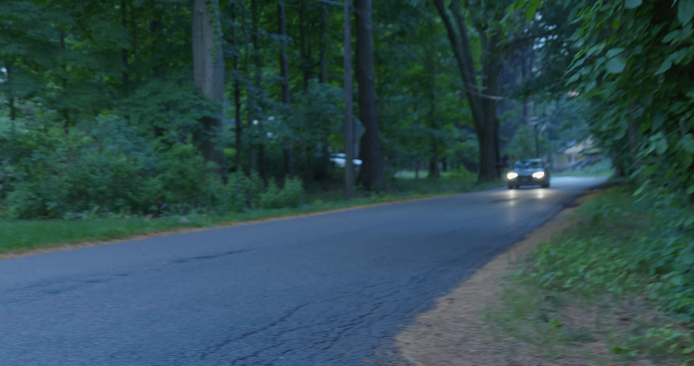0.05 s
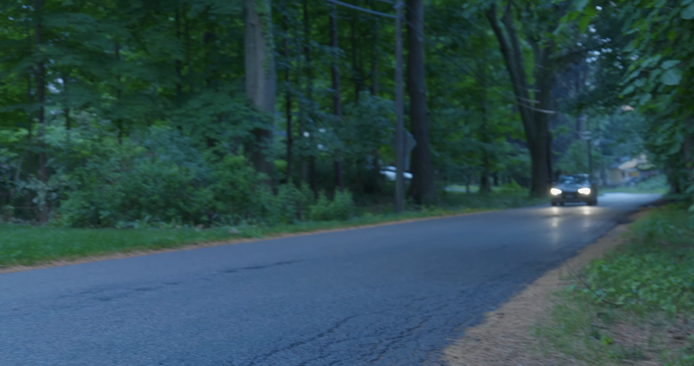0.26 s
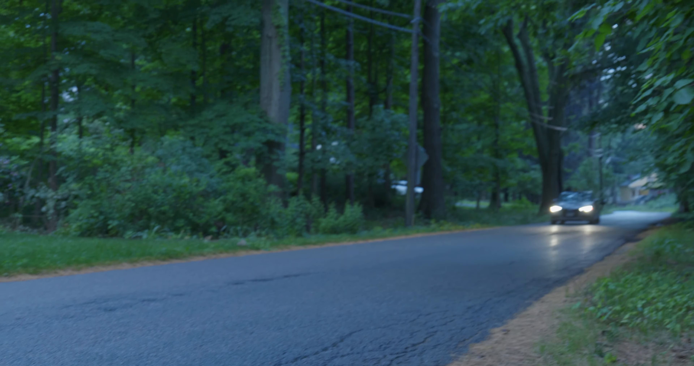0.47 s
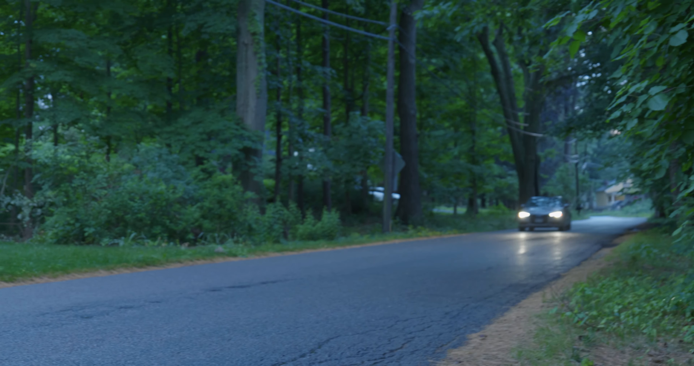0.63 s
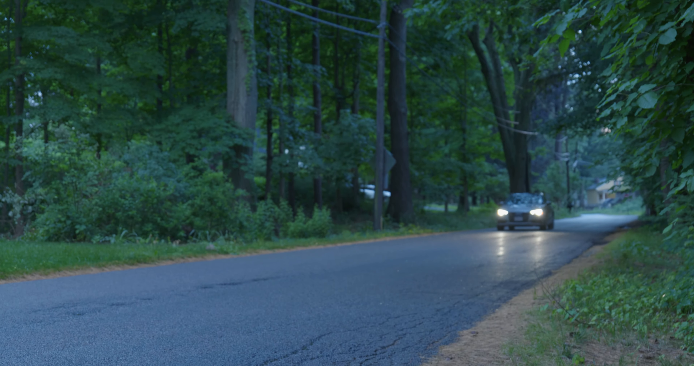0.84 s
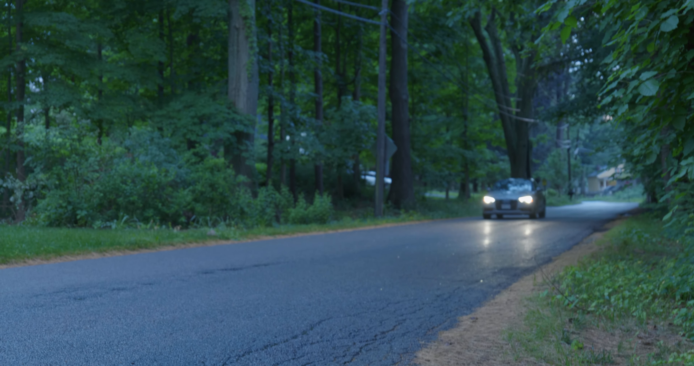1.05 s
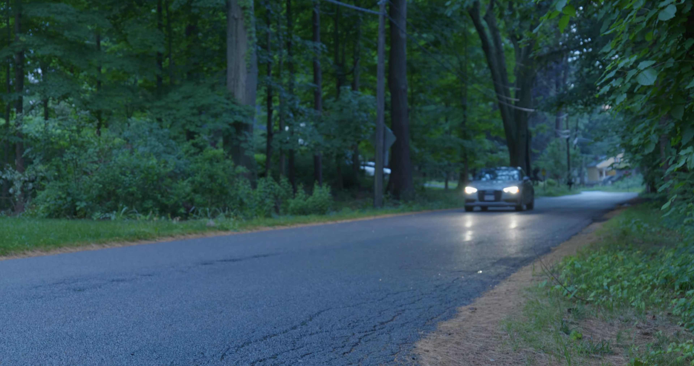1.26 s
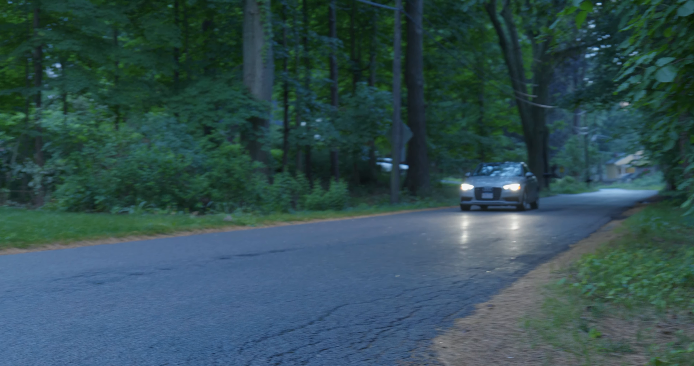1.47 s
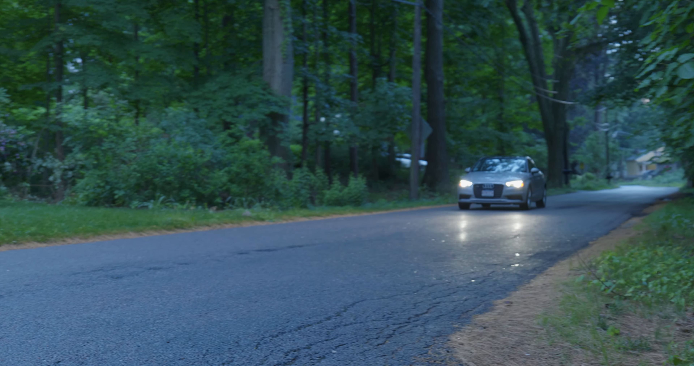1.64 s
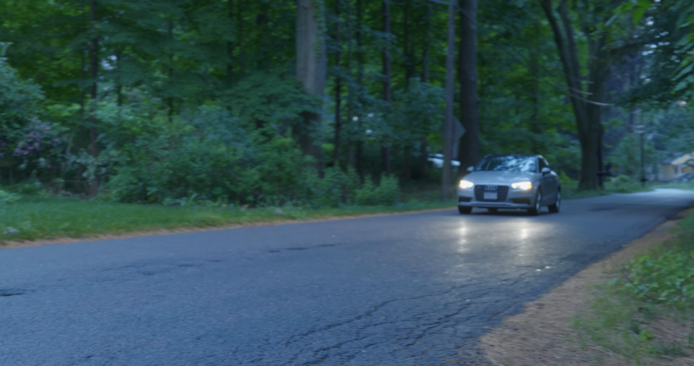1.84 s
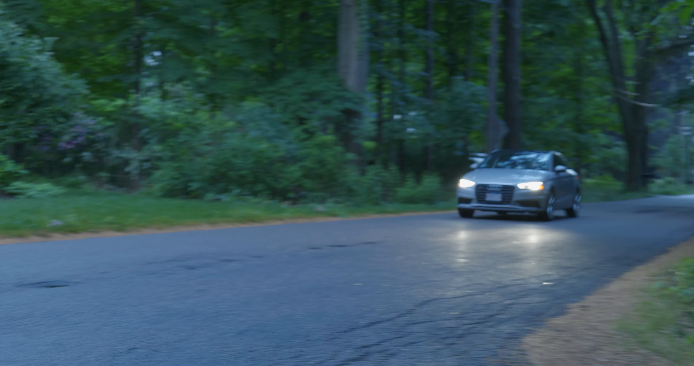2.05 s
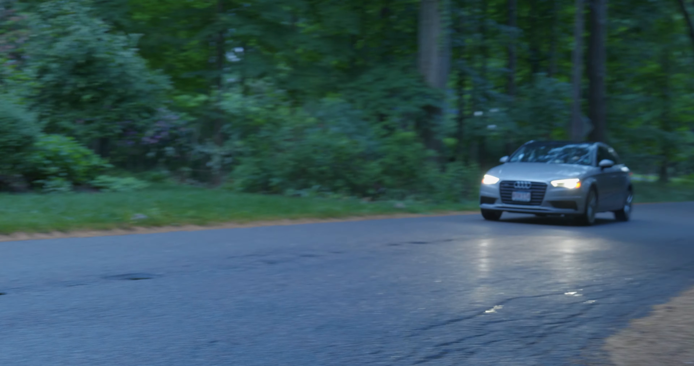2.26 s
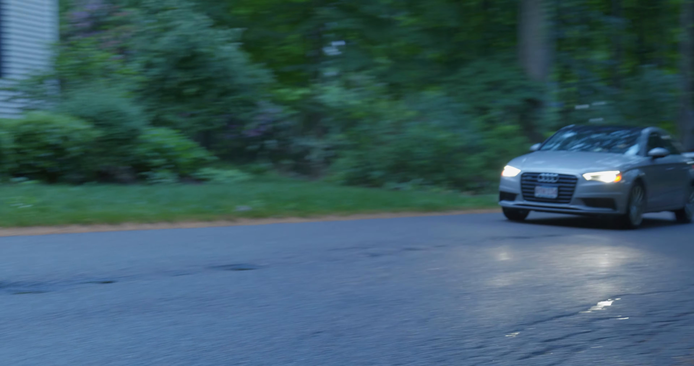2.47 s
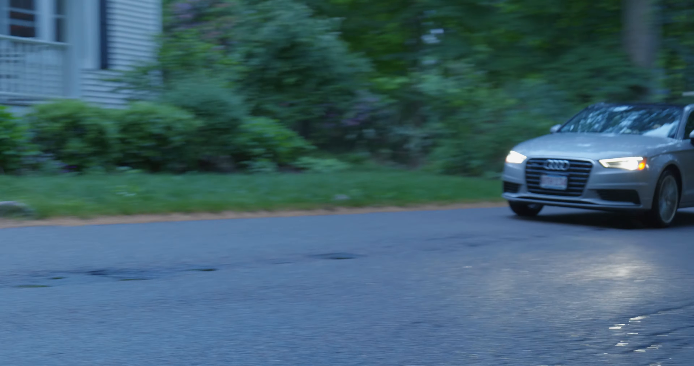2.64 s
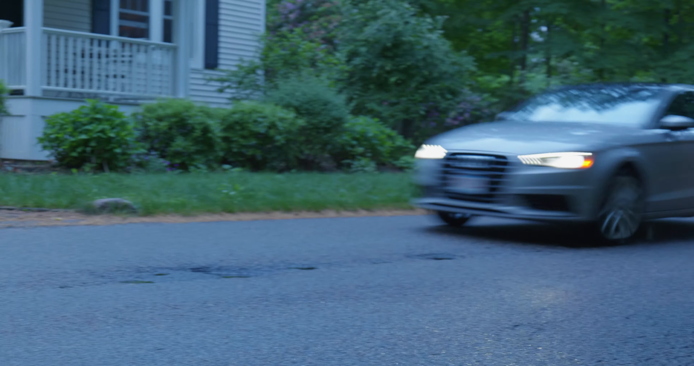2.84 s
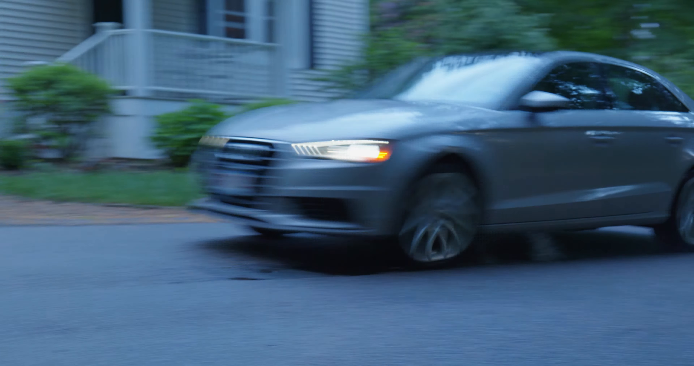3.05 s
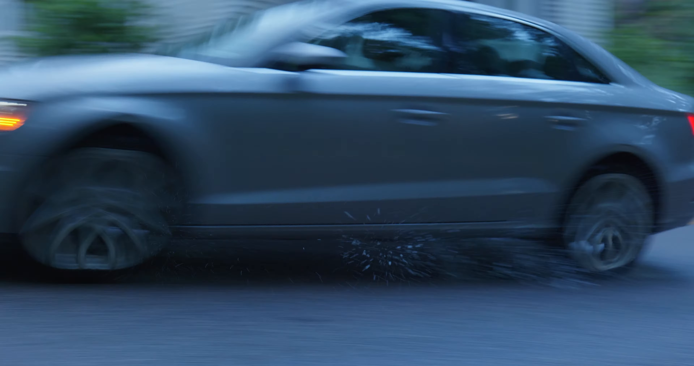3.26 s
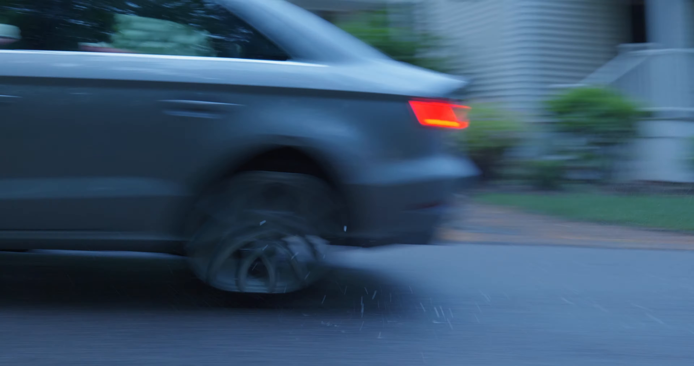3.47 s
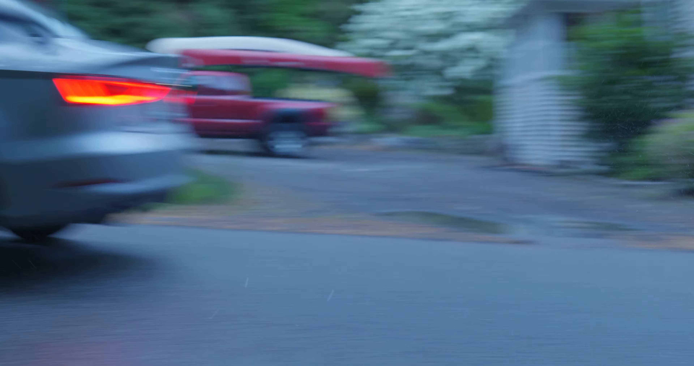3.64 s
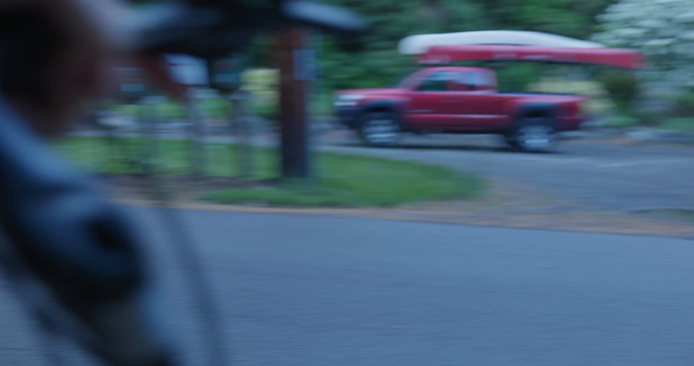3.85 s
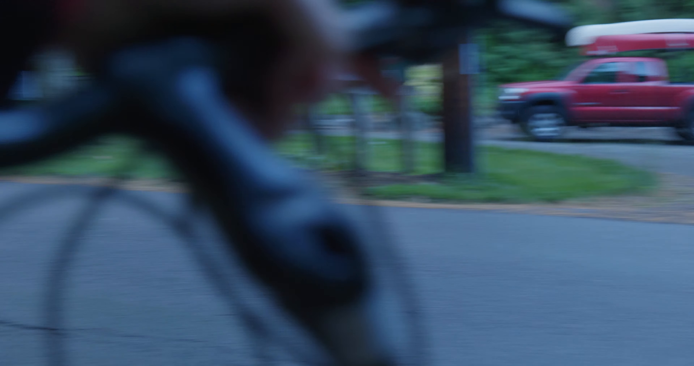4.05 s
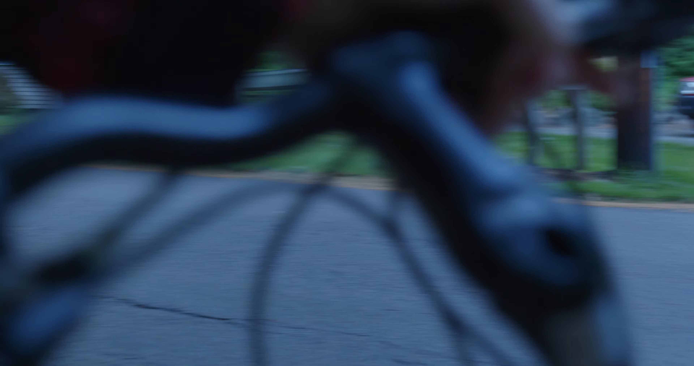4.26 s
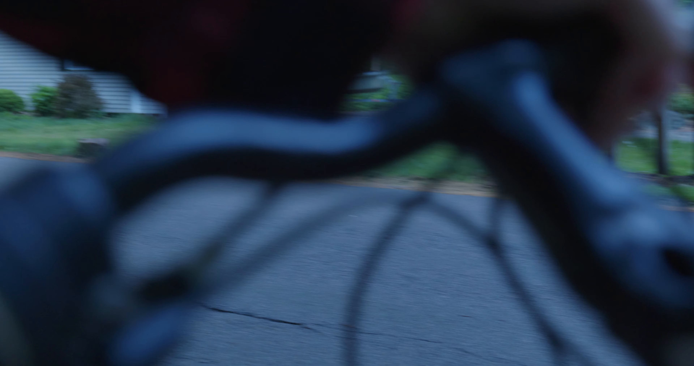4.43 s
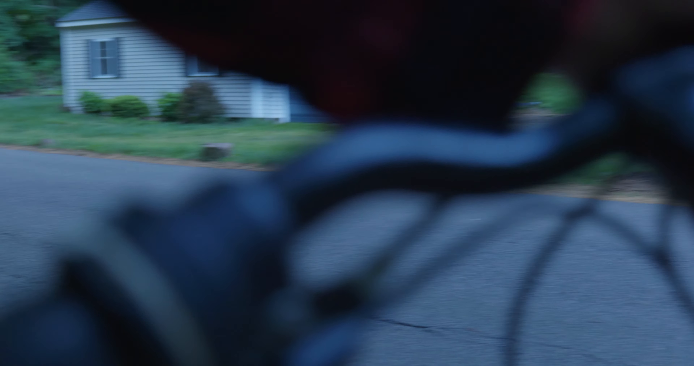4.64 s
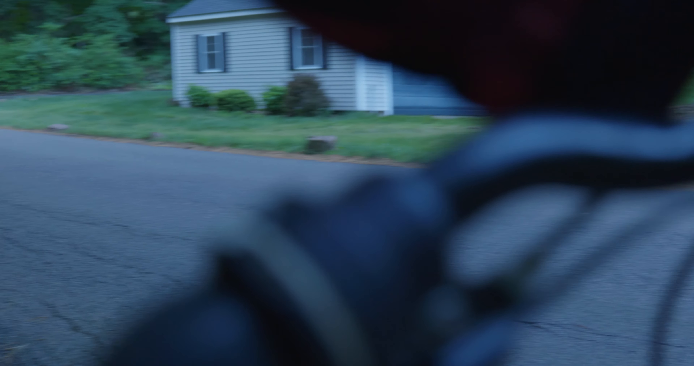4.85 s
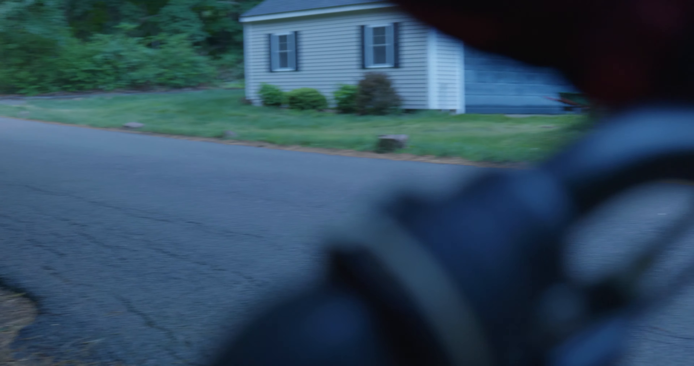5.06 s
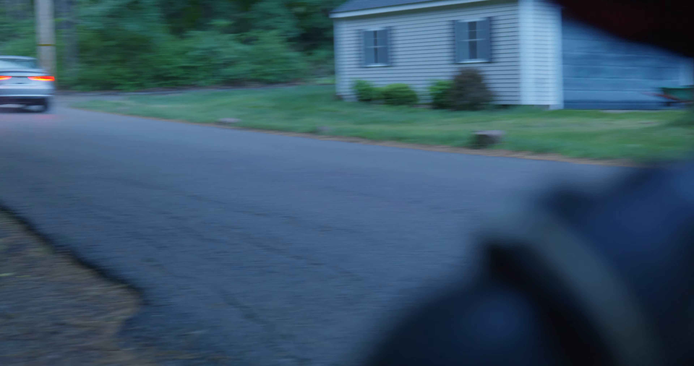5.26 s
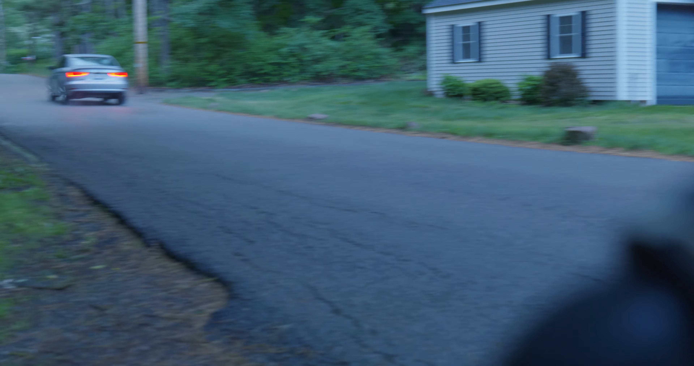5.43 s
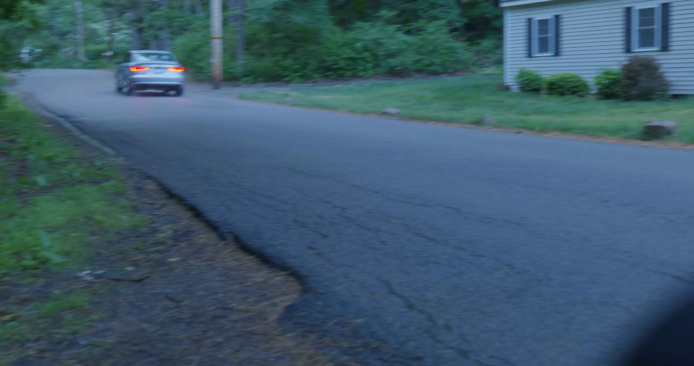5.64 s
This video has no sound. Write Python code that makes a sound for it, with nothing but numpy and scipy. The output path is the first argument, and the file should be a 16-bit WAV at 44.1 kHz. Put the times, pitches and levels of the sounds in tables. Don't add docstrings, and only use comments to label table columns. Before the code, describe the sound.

In still, dripping woods, a car's tyres approach on wet asphalt, rumble and roar swelling for three seconds. At the close pass, wheels slap puddles in rapid sharp splashes with hard little pops, then a bright spray hiss recedes. Outdoor microphone close to the roadside, nearly mono, turning after the car.

```python
import sys
import numpy as np
from scipy import signal
from scipy.fft import rfft, irfft
from scipy.io import wavfile
from scipy.ndimage import uniform_filter1d

SR = 44100
rng = np.random.default_rng(int(sys.argv[2]) if len(sys.argv) > 2 else 0)


def int16_out(signal):
    q = np.round(np.clip(np.atleast_2d(signal).T, -1, 1) * 32767)
    wavfile.write(sys.argv[1], SR, q.astype(np.int16))


def how_loud(loudness_db):
    steps = np.asarray(loudness_db, float) / 20
    return 10 ** steps


N = 251370
FRAME = 2048


def evened(x):
    return x / np.sqrt(np.mean(x ** 2) + 1e-20)


def read(points, hz):
    f, value = np.transpose(points)
    return np.interp(np.log(hz + 1), np.log(f + 1), value)


def over_time(points, t):
    return np.interp(t, *np.transpose(points))


def add(mix, s, sound):
    part = mix[:, max(round(s * SR), 0):][:, :sound.shape[1]]
    part += sound[:, :part.shape[1]]


def coloured(x, gain_db):
    hz = np.fft.rfftfreq(x.shape[-1], 1 / SR)
    return irfft(rfft(x) * how_loud(gain_db(hz)), x.shape[-1])


def panned(level_db, pan_db):
    return how_loud(level_db + np.array([[0.5], [-0.5]]) * pan_db)


# (time [s], bearing [0 coming, 1 alongside, 2 just past, 3 leaving])
BEARING = [(0, 0), (2.6, 0.24), (3.15, 1.18), (3.45, 1.1), (3.75, 3.5), (4.0, 3), (4.3, 3), (5.7, 3)]
# (frequency [Hz], level [dB per Hz])
COMING = [(60, -60), (100, -11.5), (270, -1.5), (390, -14), (500, -14), (780, -13), (1030, 2.5),
          (1700, -10), (2550, -16), (3300, -23.5), (4300, -27.5), (5300, -35), (8000, -39.5),
          (10500, -54.5), (15800, -71)]
ALONGSIDE = [(60, -29), (120, -5.5), (221, 1), (307, -2), (450, -18), (694, -2), (1100, -5), (1850, -11),
             (2800, -27), (3900, -34.5), (5000, -43), (7000, -42.5), (11000, -53), (15800, -64)]
PAST = [(60, -34), (136, -12), (232, -12.5), (416, -8), (618, -14.5), (1190, -5), (2000, -12.5),
        (3400, -21.5), (4100, -23), (5200, -33), (7200, -39), (10100, -45.5), (13500, -55), (15800, -65)]
LEAVING = [(50, -44), (110, -16), (232, -7.5), (340, -13.5), (450, -8.5), (850, 1.5), (1500, 0),
           (2000, -10), (2900, -14.5), (4000, -13.5), (5200, -17), (7500, -20.5), (10100, -21),
           (12800, -31.5), (14500, -46), (15800, -60)]
# (frequency [Hz], width [Hz], level [dB])
CAVITY = [
    (179.5, 8.8, 5.5),
    (229.9, 10.1, 9),
    (289.7, 10.6, 10),
]


def colour_db(hz, t):
    bearing = over_time(BEARING, t)
    db = 0
    for k, colour in enumerate((COMING, ALONGSIDE, PAST, LEAVING)):
        share = np.clip(1 - abs(bearing - k), 0, 1)
        db = db + np.outer(read(colour, hz), share)
    for centre, width, lift_db in CAVITY:
        db = db + lift_db * np.exp(-((hz - centre) / width) ** 2)[:, None]
    return db


PASS_S, SPEED_M_S, NEAREST_M = 3.276, 12.44, 2.95
# (level at the pass [dB], share of distance loss [1], fore-and-aft beaming [dB],
# share of coarse road [1], share of standing water [1])
LAYERS = [
    (-17, 1.554, 0.2, 1.2, 0.01),
    (-21, 1.205, 9.5, 0.17, 0.011),
    (-34, 0.89, 5.5, 0.092, 0.3),
    (-36.5, 1.212, 0.3, 0.01, 1.17),
]
# (time [s], level [dB])
COARSE = [(0, 1), (1.0, 2.5), (1.33, 5), (1.63, 6), (1.95, 1), (2.24, -2), (2.5, 0.5), (2.78, 0.5),
          (3.2, -0.5), (3.32, 1.5), (3.48, -1), (3.87, 3), (4.2, 2.5), (4.6, 0.5), (5.02, 3), (5.3, 2.5),
          (5.7, 4.5)]
# (time [s], level [dB])
WATER = [(0, -1.5), (1.75, 1.5), (2.35, 1), (2.76, -1.5), (3.03, -5.5), (3.3, 1), (3.55, 3), (3.72, -4),
         (3.9, -2.5), (4.06, -0.5), (4.17, 4), (4.38, 10.5), (4.79, 6.5), (5.7, 8)]


def layer_levels_db(t):
    along = SPEED_M_S * (t - PASS_S)
    reach = np.hypot(along, NEAREST_M)
    distance_db = -20 * np.log10(reach / NEAREST_M)
    beaming = (along / reach) ** 2
    drives = [np.ones(len(t)), distance_db, beaming, over_time(COARSE, t), over_time(WATER, t)]
    return np.array(LAYERS) @ np.array(drives)


# (frequency [Hz], width [Hz], level far [dB], midway [dB], close [dB])
ECHOES_AHEAD = [(538, 68, 2.5, 0, -7.5), (585, 52, -10.5, -1.5, 0), (960, 133, 3.5, 4.5, 4),
                (1028, 38, 0, 0.5, 4), (1352, 63, -9, -9, -14), (1750, 130, 5, 0.5, -2.5),
                (2456, 78, -0.5, -6, -11), (2700, 110, 1, 0.5, -3), (2920, 80, -14, -10, -7),
                (3670, 120, 4, 1, 2.5), (4930, 300, -8, -5.5, -7), (6250, 180, -7, -2, -6),
                (6630, 230, 6.5, -1.5, -1), (13000, 1500, -9, 2, 3)]
# (time [s], time [s], time [s])
AHEAD_S = (0, 2.54, 2.57)
# (time [s], pitch factor [1])
STRETCH = [(0, 0.97), (1.5, 0.96), (2.4, 0.9), (2.9, .97), (3.3, 1.05), (3.5, 1.07), (3.7, 1.22)]
# (frequency close [Hz], frequency far [Hz], width [Hz], level close [dB], far [dB])
ECHOES_BEHIND = [(733, 606, 166, -3, -6), (1010, 1070, 110, 8, 0), (1620, 1710, 170, -1, 0),
                 (2100, 2260, 270, -2, -8.5), (2580, 2500, 140, 5, 0), (2910, 2850, 31, -4, -8),
                 (4560, 5100, 580, -11.5, -5.5), (5650, 6300, 460, -14, -8), (8650, 8600, 510, -6, -11),
                 (13400, 12800, 5300, 7, -5.5)]
# (time [s], time [s])
BEHIND_S = (4.27, 5.25)
# (time [s], time [s], time [s])
SWAP_S = (3.69, 3.85, 4.16)
EARLY_S_PER_OCTAVE = 0.14
RECEDE_BEND = 0.66


def echoes_db(hz, t):
    stretch = over_time(STRETCH, t)
    gone = np.interp(t, BEHIND_S, (0, 1)) ** RECEDE_BEND
    bands = []
    for f, width, *db in ECHOES_AHEAD:
        sooner = t + EARLY_S_PER_OCTAVE * np.log2(f / 1000)
        fade = np.interp(sooner, SWAP_S[:2], (1, 0))
        bands.append((f * stretch, width, fade * np.interp(t, AHEAD_S, db)))
    for near, far, width, near_db, far_db in ECHOES_BEHIND:
        sooner = t + EARLY_S_PER_OCTAVE * np.log2(near / 1000)
        fade = np.interp(sooner, SWAP_S[::2], (0, 1))
        bands.append((near + (far - near) * gone, width, fade * (near_db + (far_db - near_db) * gone)))
    return sum(db * np.exp(-((hz[:, None] - centre) / width) ** 2) for centre, width, db in bands)


def flicker(span_s):
    size = max(round(span_s * SR), 2)
    smooth = uniform_filter1d(rng.standard_normal(N), size)
    return evened(uniform_filter1d(smooth, size))


def crackle(per_s, size_db, share, span=40):
    sizes = how_loud(size_db * np.minimum(rng.exponential(1, N), 4))
    drops = (rng.random(N) < per_s / SR) * sizes
    bursts = signal.lfilter([1], [1, -np.exp(-1 / span)], drops)
    return evened(1 + share * evened(bursts))


LAYER_EDGES_HZ = [450, 2200, 5500]
# (time [s], left minus right [dB])
AIM = [(0, -3), (1.5, -1.8), (2.78, -3.5), (3.22, -1.5), (3.48, 2), (3.87, 5), (4.6, 4), (5.2, 3),
       (5.7, 1.5)]
# (frequency [Hz], share of that lean [1])
LEAN = [(200, 0.07), (600, 0.57), (1200, 1.26), (5000, 1), (8000, .5), (11000, 0.6)]
# (frequency [Hz], level [dB])
SCATTER = [(60, -25), (200, -63), (600, -16), (1500, -13.5), (5000, -13), (7000, -14), (9000, -17),
           (11500, -11), (13000, -2), (15000, 4)]


def tyres(patchy_db=0.68, flicker_db=(0.1, 0.15, 0.6, 0.9), flicker_s=0.0038, fizz=(0, 0, 0.1, 0.3)):
    hop = FRAME // 4
    hz = np.fft.rfftfreq(FRAME, 1 / SR)
    t = np.arange(N // hop + 5) * hop / SR
    now = np.arange(N) / SR
    a, b, c, d, patches = rng.standard_normal((len(t), len(hz), 5)).T
    patches = uniform_filter1d(patches, size=16, axis=0)
    patches = evened(uniform_filter1d(patches, size=7, axis=1))

    lean = how_loud(np.outer(read(LEAN, hz), over_time(AIM, t)) / 2)
    echoes = how_loud(echoes_db(hz, t))
    direct = (a + 1j * b) * echoes
    scattered = (c + 1j * d) * how_loud(read(SCATTER, hz))[:, None]
    z = np.array([direct * lean + scattered, direct / lean - scattered]) * how_loud(patchy_db * patches)

    colour = how_loud(colour_db(hz, t))
    below = [0] + [1 / (1 + (hz / edge) ** 8) for edge in LAYER_EDGES_HZ] + [1]
    wet = flicker(flicker_s)
    droplets = crackle(per_s=300, size_db=4.5, share=0.7)
    thrown = 0.31 + 2.0 * np.clip(over_time(BEARING, now) - 1.5, 0, 1)
    out = 0
    for k, level in enumerate(layer_levels_db(now)):
        shape = colour * np.sqrt(below[k + 1] - below[k])[:, None]
        shape = shape / np.sqrt(((shape * echoes) ** 2).sum(0))
        layer = signal.istft(z * shape, nperseg=FRAME, noverlap=FRAME - hop)[1]
        layer = evened(layer[:, :N])
        layer = layer * (1 + fizz[k] * thrown * (droplets - 1))
        out = out + layer * how_loud(level + flicker_db[k] * wet)
    return out


# (frequency [Hz], level [dB per Hz])
WOODS = [(20, -14), (50, -14), (200, -14), (1000, -15), (4000, -25), (10000, -19), (14500, -28),
         (15500, -33), (15900, -45)]


def woods(apart=0.24, level_db=-66.5):
    one, other = rng.standard_normal((2, N))
    pair = np.array([one + apart * other, one - apart * other])
    return how_loud(level_db) * evened(coloured(pair, lambda hz: read(WOODS, hz)))


# (time [s], peak [dB], centre [Hz], width [octaves], left minus right [dB])
DRIPS = [(.003, -35, 3480, .28, 3), (.004, -29.5, 9400, 0.61, -.5), (.058, -53, 9600, 0.15, 0),
         (.107, -50, 10500, .15, 0), (.177, -38, 13000, 0.42, -3), (.254, -52, 10100, .3, 3),
         (.720, -56, 12500, .3, 0), (.292, -51, 13000, .4, 2), (0.455, -52, 11000, .4, -4),
         (.690, -50, 13000, 0.38, -8), (.754, -39, 11600, .6, 6), (.755, -43, 4900, 0.27, -2),
         (.252, -46, 5000, .2, 5), (1.052, -52, 9500, 0.44, 0), (1.161, -38, 10600, 0.09, 0),
         (1.160, -40, 6150, .2, -3), (1.307, -41, 10500, 0.54, -2), (1.319, -52, 13000, .3, -2),
         (1.731, -36, 7250, 0.34, -2), (1.906, -38, 6500, .25, -.5), (2.051, -49, 14000, .25, -1),
         (4.165, -35, 9000, .3, 2), (4.181, -33, 7730, 0.27, 5), (4.22, -30, 7500, 0.55, -9)]
# (time [s], peak [dB], centre [Hz], width [octaves], left minus right [dB])
SPATTERS = [
    (.006, -39, 11000, .38, 1),
    (.013, -39, 11500, .35, 1),
    (.254, -56, 12500, .4, 5),
]
DRIP_CYCLES, SPATTER_CYCLES, DRIP_TOP_HZ = 19, 84, 14500


def drips(apart=0.29, trim_db=-4):
    out, t = np.zeros((2, N)), np.arange(FRAME) / SR
    drops = [(*d, DRIP_CYCLES) for d in DRIPS] + [(*d, SPATTER_CYCLES) for d in SPATTERS]
    for s, peak_db, centre_hz, width, pan_db, cycles in drops:

        def tick_db(hz):
            octaves = np.log2((hz + 1) / centre_hz)
            return -4.3 * (octaves / width) ** 2 - 6 * (hz / DRIP_TOP_HZ) ** 6

        one, other = rng.standard_normal((2, len(t)))
        tick = coloured(np.array([one + apart * other, one - apart * other]), tick_db)
        fall = np.clip(t / 0.00019, 0, 1) * np.exp(-(t * centre_hz / cycles) ** 2)
        add(out, s, evened(tick) * fall * panned(peak_db + trim_db, pan_db))
    return out


# (time [s], peak [dB], length [s], brightness [dB per octave])
PUDDLES = [(2.7627, -14.5, 0.01, 2.5), (2.773, -28, .012, 0), (2.877, -25, .007, -2),
           (2.926, -24.5, 0.0095, 2), (2.942, -24, 0.014, 1), (2.958, -14.5, 0.0086, 0),
           (3.004, -12, 0.0086, -1.5), (3.050, -18.5, 0.0056, -4), (3.104, -11.5, 0.014, -0.5),
           (3.180, -7, 0.0075, -0.5), (3.191, -11, 0.01, -7), (3.211, -6, .0055, -2),
           (3.212, -6, .012, -1.5), (3.219, -5, 0.0047, -2.5), (3.223, -6, 0.0086, -3.5),
           (3.256, -8.5, .012, -1), (3.279, -15.5, 0.018, 1.5), (3.36, -19.5, 0.014, 2),
           (3.383, -26, .010, 2), (3.393, -6, 0.0063, -2.5), (3.4, -12, 0.0087, 3), (3.41, -15, .013, -1),
           (3.422, -12.5, 0.0082, -4), (3.438, -15.5, 0.012, 1.5), (3.689, -9, 0.0038, -6.5)]
# (frequency [Hz], level [dB])
SPLASH = [(880, -62), (1500, -2), (2450, -5), (3200, -7.5), (4520, -11.5), (6450, -9), (10500, -16.5),
          (14500, -23), (15800, -38)]
# (frequency [Hz], level [dB])
SPLASH_APART = [(500, -30), (2000, -12), (8000, -15.5), (13000, -5)]
THUD_DB, THUD_PER_DB, THUD_PER_TILT = -3.5, 0.1, -0.6
SPLASH_LEAN = 0.62
SPLASH_KNEE_HZ = 9000
FAR_DULL_DB_PER_M = -4.5


def puddles(grain_db=2.0, tail_db=-13, tail_s=0.064, trim_db=-7):
    out, t = np.zeros((2, N)), np.arange(FRAME * 3) / SR
    for s, peak_db, length, tilt_db in PUDDLES:
        thud_db = THUD_DB + THUD_PER_DB * peak_db + THUD_PER_TILT * tilt_db
        far_db = FAR_DULL_DB_PER_M * SPEED_M_S * abs(s - PASS_S)

        def splash_db(hz):
            body = read([(300, -63), (900, thud_db)] + SPLASH, hz)
            tilt = tilt_db * np.log2(hz / 4000 + 0.05)
            return body + tilt + far_db * np.log2(np.maximum(hz / SPLASH_KNEE_HZ, 1))

        one, other, size = rng.standard_normal((3, len(t)))
        other = coloured(other, lambda hz: read(SPLASH_APART, hz))
        lumps = how_loud(grain_db * evened(uniform_filter1d(size, size=30)))
        wash = coloured(np.array([one + other, one - other]) * lumps, splash_db)
        duller = signal.lfilter([1], [1, -0.5], wash)
        burst = np.clip(t / 0.0017, 0, 1) * np.exp(-(t / length) ** 2)
        mist = how_loud(tail_db) * (1 - np.exp(-t / 0.0033)) * np.exp(-t / tail_s)
        slap = evened(wash) * burst + evened(duller) * mist
        add(out, s - 0.001, slap * panned(peak_db + trim_db, SPLASH_LEAN * over_time(AIM, s)))
    return out


# (time [s], peak [dB], pitch [Hz], time to fall 60 dB [s])
POPS = [
    (2.962, -17, 2470, 0.03),
    (3.182, -7, 1940, .015),
    (3.2138, -0.5, 2064, 0.017),
    (3.2195, -4, 2370, 0.03),
    (3.2255, -2, 687, 0.027),
    (3.263, -6, 1110, 0.017),
    (3.399, -9.5, 640, 0.036),
]


def pops(rise=0.052):
    out, t = np.zeros((2, N)), np.arange(FRAME) / SR
    for s, peak_db, hz, t60 in POPS:
        ring = np.sin(2 * np.pi * hz * (t + rise * t ** 2 / t60)) * how_loud(peak_db - 60 * t / t60)
        add(out, s, np.array([ring, ring]) * np.clip(t / 0.0008, 0, 1))
    return out


def scene():
    return tyres() + woods() + drips() + puddles() + pops()


def band_limit(x):
    return signal.sosfilt(signal.butter(12, 15950, fs=SR, output="sos"), x)


def record(dry, cut_hz=70, top_hz=15750):
    thin = signal.sosfilt(signal.butter(2, cut_hz, "high", fs=SR, output="sos"), dry)
    edge = signal.firwin(numtaps=255, cutoff=top_hz, fs=SR)
    mix = signal.oaconvolve(np.clip(thin, -1, 1), edge[None], "same")
    return band_limit(mix)


dry = scene()
out = record(dry)
int16_out(out)
```